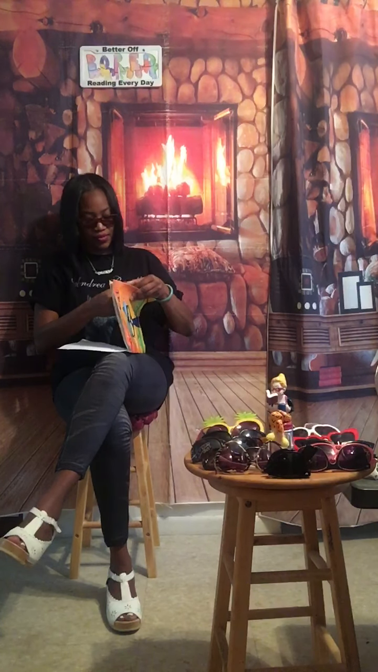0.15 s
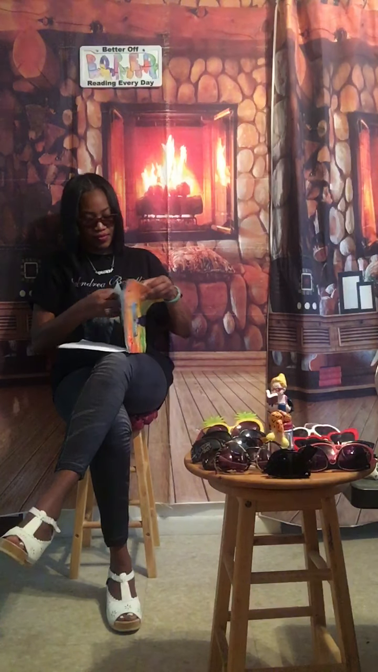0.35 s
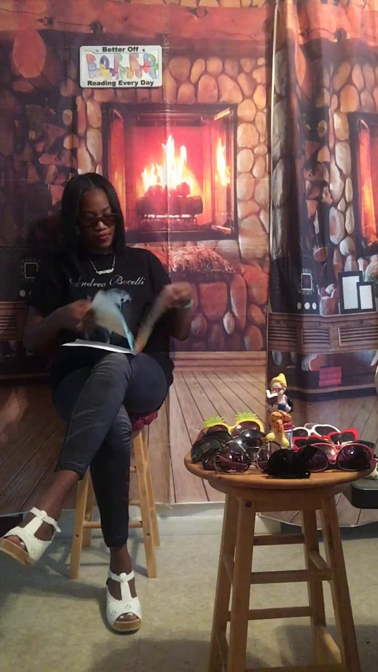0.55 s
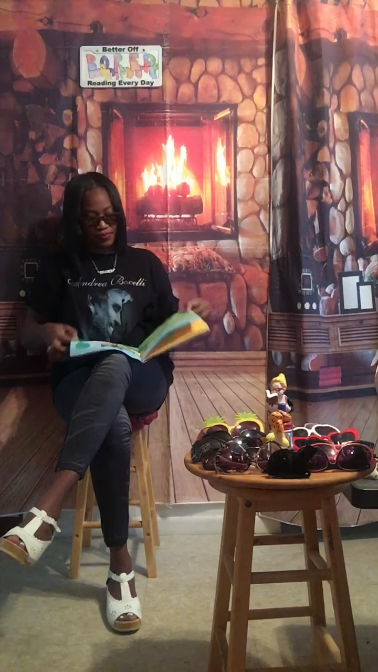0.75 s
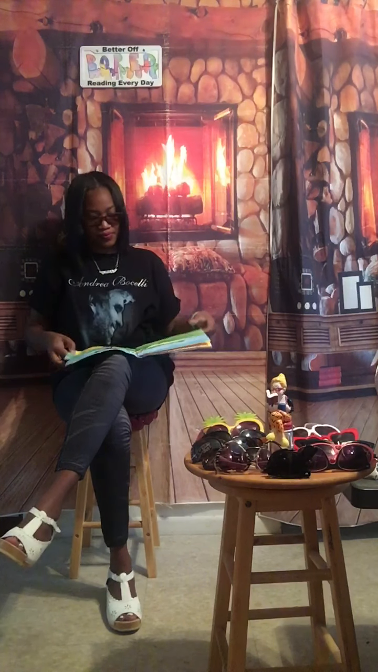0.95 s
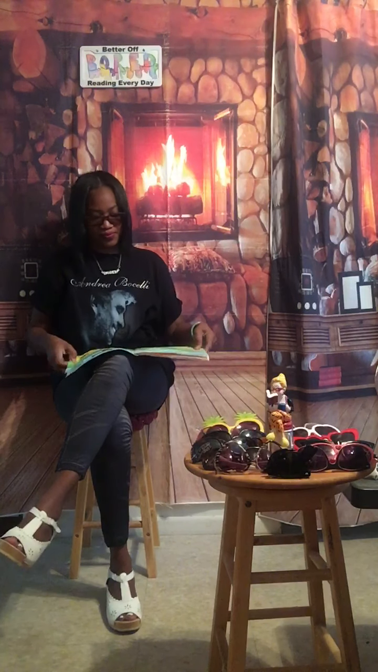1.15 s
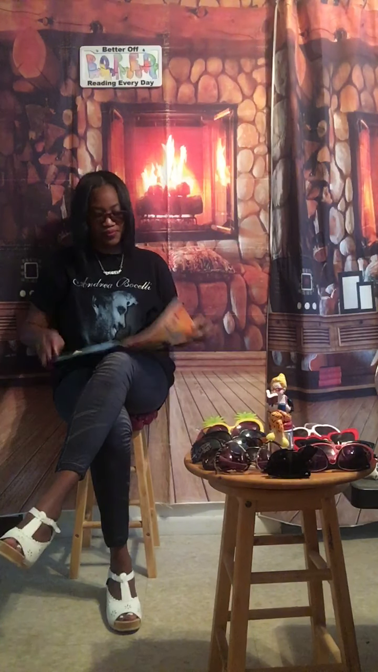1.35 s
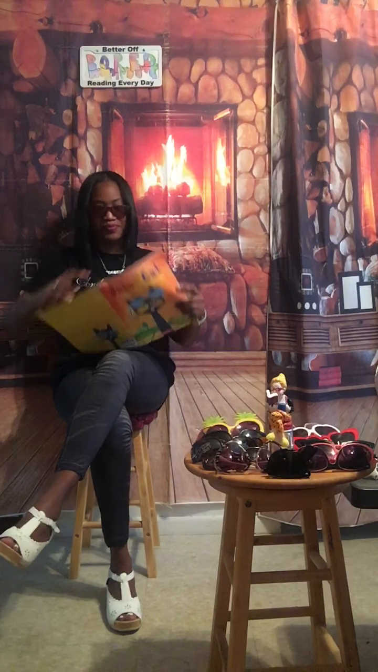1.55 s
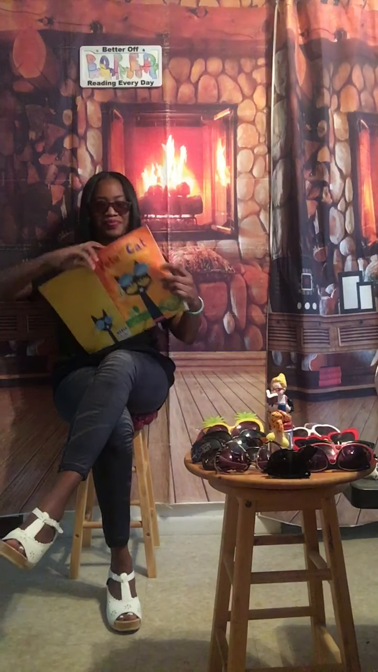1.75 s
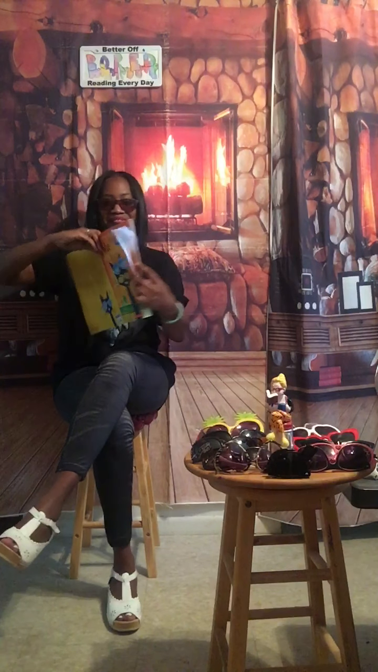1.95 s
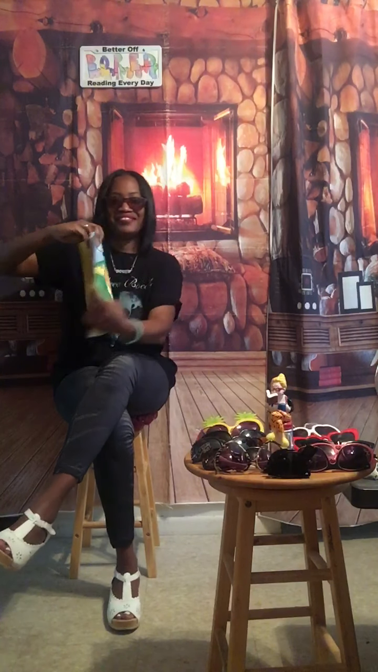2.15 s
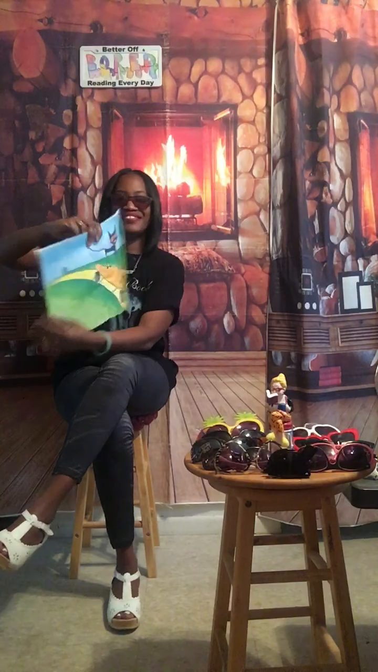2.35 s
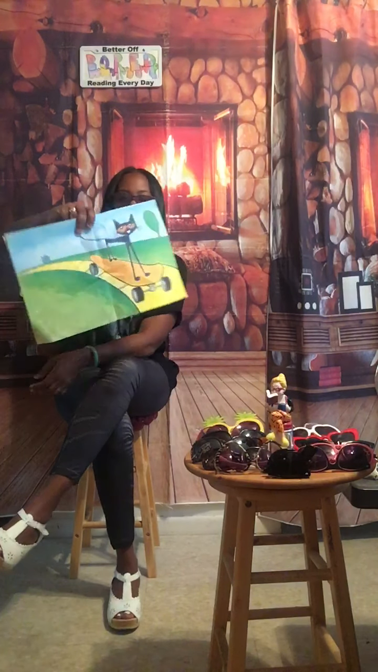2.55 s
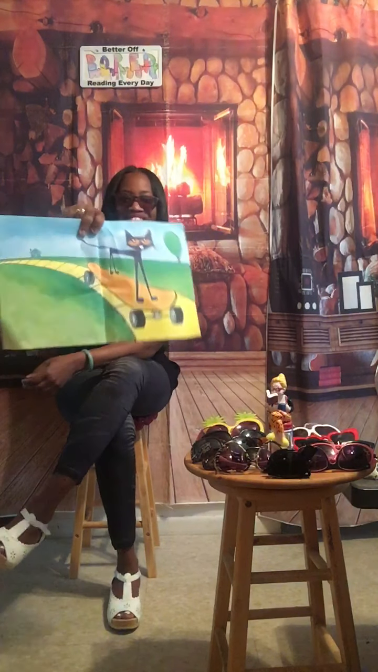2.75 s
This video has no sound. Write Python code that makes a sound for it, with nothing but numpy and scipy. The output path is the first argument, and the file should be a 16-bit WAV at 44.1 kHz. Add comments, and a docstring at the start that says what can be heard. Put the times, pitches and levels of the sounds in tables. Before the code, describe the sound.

Book pages flip and slide with papery rustles and sharp little snaps in a quiet humming room

```python
"""Leafing through a picture book

A large paper book is leafed, closed up and turned round in a small room.
Pages snap in short gritty bursts, paper slides with a rustle made of thousands of tiny slips,
and swung pages push soft low puffs of air. The room answers with a fading tail of noise.
Mains hum, two low drones and a faint air noise lie underneath."""
import sys
import numpy as np
from scipy import signal
from scipy.fft import rfft, irfft
from scipy.io import wavfile
from scipy.ndimage import uniform_filter1d

SR = 44100
rng = np.random.default_rng(int(sys.argv[2]) if len(sys.argv) > 2 else 0)


def unload_wav(signal):
    """Save mono or channel-first audio to the path in sys.argv[1] as 16-bit WAV at rate SR, clipped to [-1, 1]."""
    wavfile.write(
        sys.argv[1],
        SR,
        np.round(np.clip(np.atleast_2d(signal).T, -1, 1) * 32767).astype(np.int16),
    )


N = 121275  # length in samples, 2.75 s

# Five frequency bands, low to top. The list holds their centres in Hz between two outer edges in Hz.
BANDS_HZ = [230, 420, 1000, 2200, 4800, 10500, 20000]

# Sliding paper. Each row: time in seconds, then the relative level in dB of five bands from low to top.
RUSTLE = [(0, -73, -72, -75.5, -76.5, -81), (.16, -73.5, -77, -91, -81.5, -85),
          (.22, -69, -69, -61.5, -61.5, -75), (.25, -58, -54, -55, -64, -70), (.3, -75, -79, -81, -87, -86),
          (.345, -66, -61, -59, -62, -85), (.37, -63, -62, -56.5, -71, -86),
          (.58, -70.5, -69, -72, -68.5, -82), (.63, -59, -55, -54, -67, -66),
          (.72, -67, -60, -49, -63.5, -77), (.79, -60, -48.5, -52, -62.5, -71),
          (.86, -81, -74, -73, -75, -76), (.92, -76, -77, -77, -72, -80),
          (1.02, -70, -69, -67.5, -70.5, -72.5), (1.11, -66.5, -65.5, -68.5, -63, -78),
          (1.145, -69, -63, -49, -68, -74), (1.17, -69, -75, -64.5, -56, -60.5),
          (1.23, -61.5, -51, -54, -59, -64), (1.3, -61.5, -60.5, -67, -62, -72.5),
          (1.4, -70.5, -65, -68.5, -66.5, -71.5), (1.5, -67, -60.5, -59, -64, -71.5),
          (1.62, -70, -71, -60.5, -63.5, -69.5), (1.75, -72.5, -73, -91, -71.5, -78),
          (1.785, -72.5, -74, -63, -59.5, -76), (1.82, -69, -68, -58, -64, -65),
          (1.87, -65.5, -60, -65, -63, -72), (2.05, -67, -65.5, -61, -65, -70.5),
          (2.2, -73, -64.5, -66, -64, -73.5), (2.3, -64, -64, -56.5, -59, -64.5),
          (2.33, -55.5, -55.5, -62, -58, -72), (2.355, -54.5, -50, -48.5, -55.5, -64.5),
          (2.39, -60.5, -55, -60, -57.5, -66), (2.45, -58, -73, -52, -69, -62),
          (2.5, -73, -74, -82, -74, -89), (2.6, -60, -67.5, -81.5, -77.5, -83),
          (2.75, -80, -80.5, -83.5, -79, -82.5)]
RUSTLE_DB, FLICKER_DB = -1, 1.6  # shift of all rustle levels, size of their random flicker
GRAINS_PER_S, GRAIN_DROP_DB = 7000, 0.5  # average number of slips, average drop in strength of a slip
RUSTLE_WET = 0.41  # share of the rustle sent to the room

# The room: fade times (s) of the tail by 60 dB, level of the tail and silence before it.
ROOM_T60_S, ROOM_TOP_T60_S, ROOM_DB, ROOM_GAP_MS = 0.23, 0.25, 0, 2.9
TAIL_BLEND_S = 0.3  # time for one random tail to blend into the next

# Low tones. Each row: time in seconds, drone pitch in Hz, drone level in dB, mains hum level in dB,
# lower drone level in dB.
TONES = [(0, 84.4, -60.5, -60, -84), (.12, 84.14, -68, -67, -63), (.42, 84.32, -76, -60, -64),
         (.55, 75.95, -63.5, -67.5, -67), (.66, 71.9, -57.5, -61, -67), (.93, 71.7, -55.5, -64, -59.5),
         (1.13, 71.76, -59.5, -62.5, -62), (1.22, 71.6, -57, -55, -89), (1.33, 72.35, -66, -67.5, -61),
         (1.44, 72.1, -66, -56.5, -59.5), (1.58, 72, -61, -61.5, -57.5), (1.66, 72.8, -81, -75.5, -90),
         (1.82, 73.5, -67, -55.5, -52), (1.92, 72.8, -76, -56.5, -66), (2.02, 73.5, -58, -69.5, -64),
         (2.16, 73.3, -59.5, -60, -67), (2.22, 72.7, -58.5, -58, -74), (2.4, 72.4, -56.5, -61, -59),
         (2.57, 75.6, -57, -72, -62), (2.75, 73.7, -62, -56.5, -72)]
MAINS_HZ, LOWER_HZ, WAVER_DB = 119.3, 57.4, 0.1

# Tone colour of the air noise. Each row: frequency in Hz, relative level in dB per Hz.
AIR = [(12, -68), (20, -20), (43, -19), (63, -2.5), (123, -10), (146, -17.5), (241, -17), (301, -35),
       (357, -21.5), (410, -25), (446, -38), (1570, -27.5), (14300, -55), (16000, -69)]
AIR_DB = -65  # overall level

# Snaps of a page or cover. Each row: start in seconds, relative level in dB of five bands from low to top,
# decay time in ms, attack time in ms, hollow ring pitch in Hz, relative ring level in dB.
SNAPS = [(.175, -70, -54.5, -63, -85, -85, 3.8, 1.5, 1300, -58.5),
         (.228, -53, -50, -43.5, -40, -46.5, 5.3, 3.2, 1970, -42),
         (.237, -56, -54, -44.5, -57, -61, 4.5, 1.6, 2000, -44.5),
         (.366, -58, -50, -44.5, -51.5, -80, 5, 1.3, 2000, -60),
         (.439, -42.5, -40, -40, -31.5, -42, 3.6, 0.91, 1760, -35),
         (.455, -63, -43.5, -45, -62, -70, 5.6, 2, 1240, -40),
         (.608, -60, -39, -41.5, -58, -72, 11.3, 1.8, 1540, -45),
         (.643, -41.5, -34.5, -46, -69, -68, 4.1, 1.9, 655, -38),
         (0.655, -54, -31, -39.5, -45, -67, 4.2, 2.1, 1260, -38),
         (0.699, -49, -47, -44, -55, -65, 4.4, 1.8, 2700, -52),
         (0.745, -51, -53, -48, -50, -78, 3.8, 2.7, 607, -46.5),
         (.768, -56, -48, -47.5, -64, -78, 7.8, 2.6, 590, -42),
         (.8, -54.5, -54, -54, -69, -76, 9.1, 4.6, 640, -49.5),
         (.839, -54.5, -51, -54, -65, -76, 9.5, 3.6, 625, -49.5),
         (1.216, -52.5, -49.5, -46.5, -46, -67, 5.9, 2.5, 2520, -45.5),
         (1.235, -52, -44.5, -48, -53.5, -72, 2.9, 1.6, 3700, -52),
         (1.314, -66, -51.5, -50, -59, -70, 2.4, 1.7, 1900, -56.5),
         (1.502, -37, -35.5, -38, -57, -80, 2.8, 0.98, 940, -38.5),
         (1.7676, -48, -50, -47, -49, -58, 1.5, 0.26, 417, -46.5),
         (1.904, -49.5, -44, -41.5, -52, -70, 2.65, 1.5, 1900, -49),
         (2.087, -56, -46, -50, -77, -82, 2.2, 2.4, 1340, -43),
         (2.29, -60, -48.5, -52, -61.5, -72, 3.5, 2.1, 1230, -48),
         (2.403, -39, -38, -39.5, -42.5, -72, 6, 2.6, 1220, -47.5),
         (2.554, -63, -58, -65.5, -68, -80, 5.5, 1.8, 1730, -63.5)]
SNAP_DB, SNAP_GRIT_DB, RING_Q = -2.5, 1.35, 7.5  # shift of all snap levels, roughness, ring sharpness

# Puffs of air pushed by a swung page. Each row: middle in seconds, level in dB, spread in seconds.
PUFFS = [(0.652, -62, 0.056), (.79, -64, 0.055), (1.245, -65.5, 0.055), (1.518, -66, 0.045),
         (2.42, -64, 0.048)]
PUFF_HZ = 163

# Response of the microphone. Each row: frequency in Hz, gain in dB.
MIC = [(200, -0.2), (290, 0.3), (360, 2), (430, -1), (520, -0.34), (680, -3), (760, -5.5), (1200, -1.24),
       (2000, -0.4), (4200, 0.12), (4800, -4), (5800, 0.55), (7500, -5), (9300, -3.8), (10500, -6),
       (12000, -1), (16000, -0.5)]
TOP_HZ = 15850  # the sound is cut above this


def undb(db):
    """Turn decibels into a plain multiplier."""
    return 10 ** (np.asarray(db) / 20)


def unit(x):
    """Scale to an rms (average strength) of 1."""
    return x / np.sqrt(np.mean(x ** 2))


def colour(x, points):
    """Filter by (Hz, dB) points joined on a log frequency axis."""
    p = np.array(points, float)
    f = np.fft.rfftfreq(len(x), 1 / SR) + 1  # +1 avoids the log of zero
    gain_db = np.interp(np.log(f), np.log(p[:, 0]), p[:, 1])
    return irfft(rfft(x) * undb(gain_db), len(x))


def walk(rate):
    """Wander at random: levels held for 1 / rate seconds, then smoothed twice."""
    k = int(SR / rate)
    steps = np.repeat(rng.standard_normal(N // k + 1), k)
    smooth = uniform_filter1d(uniform_filter1d(steps, k), k)
    return unit(smooth[:N])


def curve(table, column):
    """Draw straight lines through one column of a table over time."""
    p = np.array(table, float)
    return np.interp(np.arange(N) / SR, p[:, 0], p[:, column])


def bands(x):
    """Split into overlapping bands with a pink tilt (weaker towards the treble), each at rms 1."""
    f = np.fft.rfftfreq(N, 1 / SR) + 1
    pink = rfft(x) / np.sqrt(f)
    parts = []
    for k in range(len(BANDS_HZ) - 2):
        triangle = np.interp(np.log(f), np.log(BANDS_HZ[k:k + 3]), [0, 1, 0])
        parts.append(unit(irfft(pink * triangle, N)))
    return parts


def rustle():
    """Paper sliding on paper and fingers slips in dense, uneven little clicks."""
    chance, size_chance = rng.random((N, 2)).T
    size_db = GRAIN_DROP_DB * np.log(1 - size_chance)  # most slips are near full size, a few are weaker
    happens = chance < GRAINS_PER_S / SR
    slips = happens * undb(size_db) * rng.standard_normal(N)
    out = np.zeros(N)
    for k, band in enumerate(bands(slips)):
        level_db = curve(RUSTLE, k + 1) + RUSTLE_DB + FLICKER_DB * walk(18)
        out += band * undb(level_db)
    return out


def room(x):
    """Direct sound plus random tails that blend steadily into one another: the echo keeps no fixed tone."""
    t = np.arange(int(0.4 * SR)) / SR
    now = np.arange(N) / SR / TAIL_BLEND_S
    treble_cut = signal.butter(1, 5000, fs=SR, output="sos")
    out = x
    for k in range(int(now[-1]) + 2):
        noise = rng.standard_normal(len(t))
        low = signal.sosfilt(treble_cut, noise)
        tail = low * undb(-60 * t / ROOM_T60_S) + (noise - low) * undb(-60 * t / ROOM_TOP_T60_S)
        # the scale uses the whole tail, before the gap is silenced
        tail = tail * (t * 1000 > ROOM_GAP_MS) / np.sqrt(np.sum(tail ** 2))
        share = np.cos(np.pi / 2 * np.clip(now - k, -1, 1))  # blend from one tail to the next
        out = out + undb(ROOM_DB) * signal.fftconvolve(x * share, tail)[:N]
    return out


def hum():
    """Three low sine tones, a drone, mains hum and a lower drone, swell and fade."""
    pitches = curve(TONES, 1), np.full(N, MAINS_HZ), np.full(N, LOWER_HZ)
    out = np.zeros(N)
    for k, hz in enumerate(pitches):
        level = undb(curve(TONES, k + 2) + WAVER_DB * walk(13.87))
        cycles = np.cumsum(hz) / SR + rng.random()  # random starting point
        out += np.sqrt(2) * level * np.sin(2 * np.pi * cycles)  # root 2 gives the sine an rms of 1
    return out


def air_noise():
    """Faint steady noise, strongest in the bass."""
    return undb(AIR_DB) * unit(colour(rng.standard_normal(N), AIR))


def snaps():
    """Each snap is a gritty burst of a few ms with its own balance of bands and a hollow ring."""
    t_ms = np.arange(4096) / SR * 1000
    grit = rng.standard_normal(N) * undb(SNAP_GRIT_DB * walk(900))
    parts, out = np.array(bands(grit)), np.zeros(N)
    for s, *band_db, decay_ms, attack_ms, ring_hz, ring_db in SNAPS:
        shape = (1 - np.exp(-t_ms / attack_ms)) ** 2 * np.exp(-t_ms / decay_ms)
        at = slice(int(s * SR), int(s * SR) + len(t_ms))
        ring = signal.lfilter(*signal.iirpeak(ring_hz, RING_Q, SR), grit[at] * shape)
        burst = np.vstack([parts[:, at] * shape, ring])
        # give every part the same energy, so that the levels alone set the balance
        size = np.sqrt(np.sum(shape ** 2) / np.sum(burst ** 2, axis=1)) / shape.max()
        out[at] += (undb(band_db + [ring_db]) * size) @ burst
    return undb(SNAP_DB) * out


def puffs():
    """Moved air makes soft low thuds: noise around one low pitch that swells and dies away."""
    t = np.arange(N) / SR
    swell = sum(undb(db) * np.exp(-((t - s) / length) ** 2) for s, db, length in PUFFS)
    low_noise = signal.lfilter(*signal.iirpeak(PUFF_HZ, 2.5, SR), rng.standard_normal(N))
    return swell * unit(low_noise)


def scene():
    """Send the snaps and part of the rustle through the room, then add everything else."""
    paper = rustle()
    in_room = room(snaps() + RUSTLE_WET * paper)
    close_paper = (1 - RUSTLE_WET) * paper
    return (in_room + close_paper + puffs() + hum() + air_noise())[None]


def record(dry):
    """The microphone has uneven gain over pitch and a steep cut at the top."""
    top_cut = signal.ellip(10, 0.2, 60, TOP_HZ, fs=SR, output="sos")
    return signal.sosfilt(top_cut, colour(dry[0], MIC))[None]


dry = scene()
out = record(dry)
unload_wav(out)
```